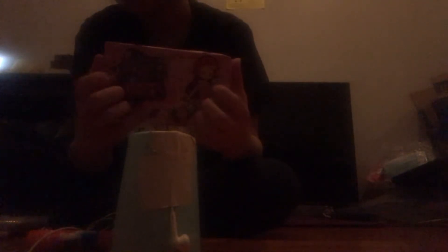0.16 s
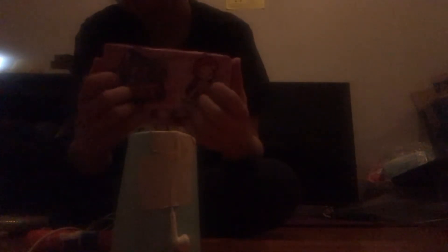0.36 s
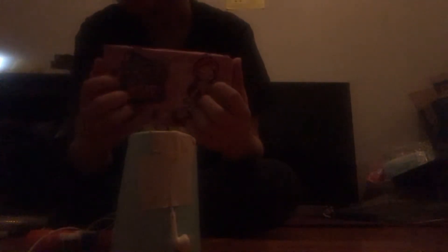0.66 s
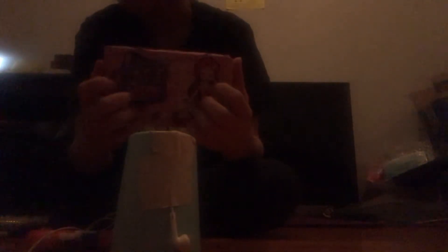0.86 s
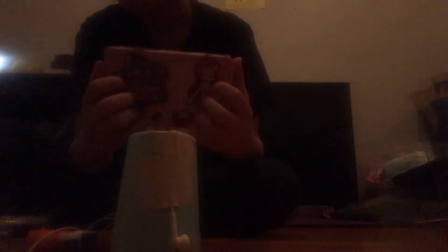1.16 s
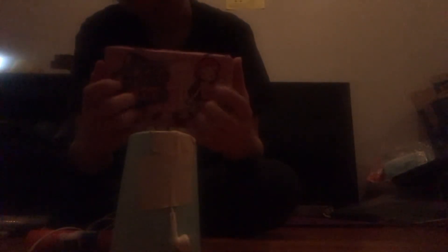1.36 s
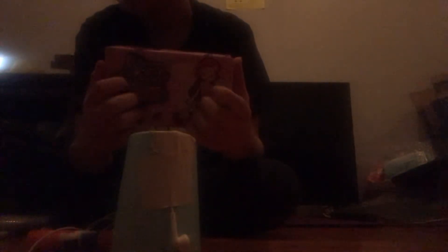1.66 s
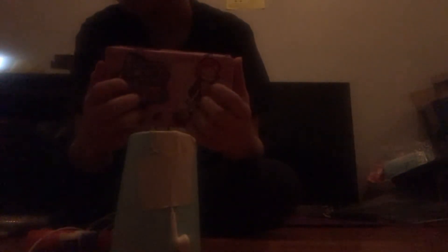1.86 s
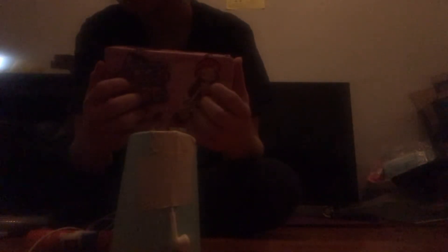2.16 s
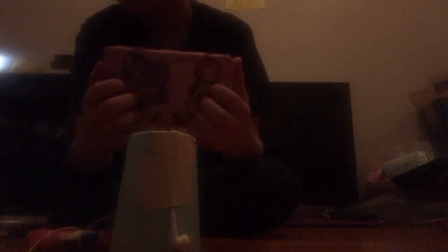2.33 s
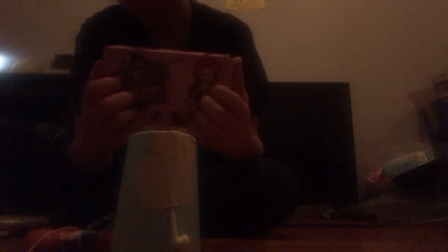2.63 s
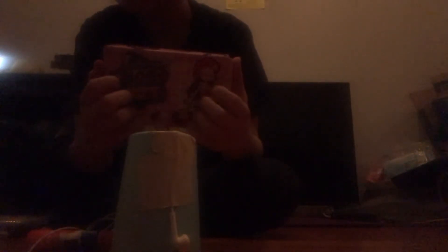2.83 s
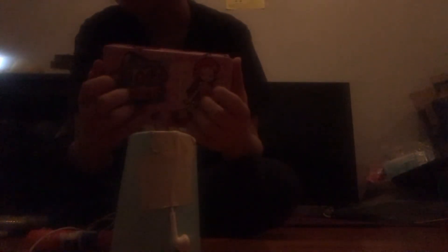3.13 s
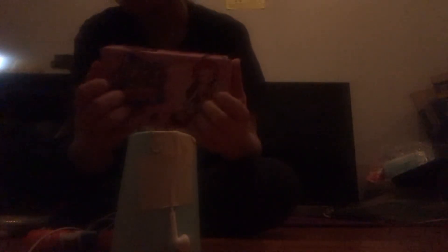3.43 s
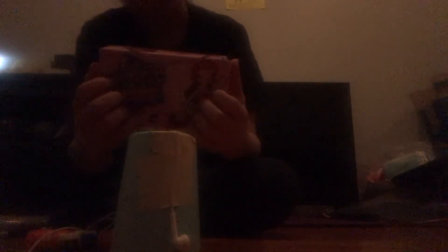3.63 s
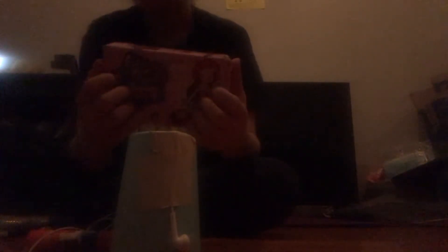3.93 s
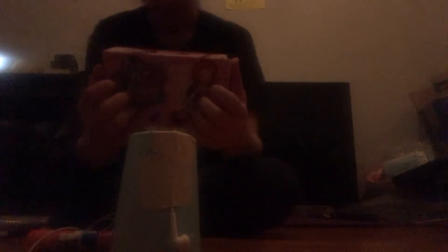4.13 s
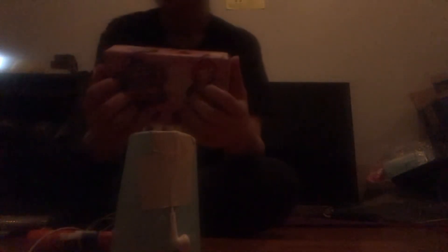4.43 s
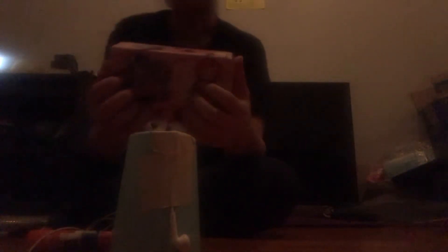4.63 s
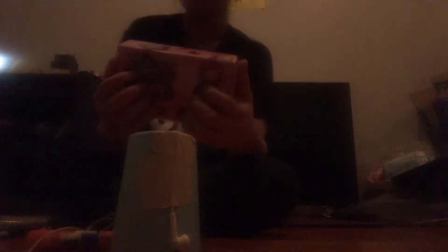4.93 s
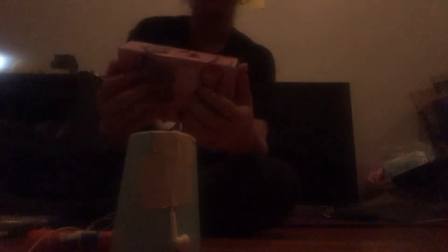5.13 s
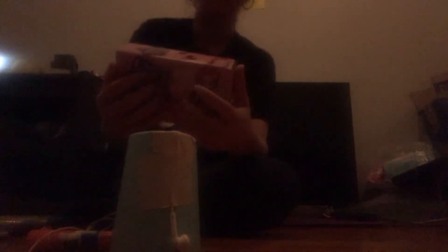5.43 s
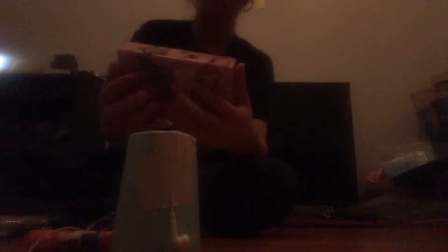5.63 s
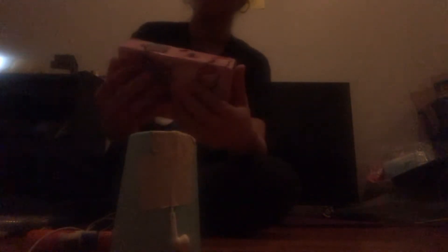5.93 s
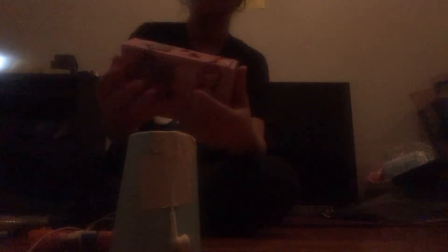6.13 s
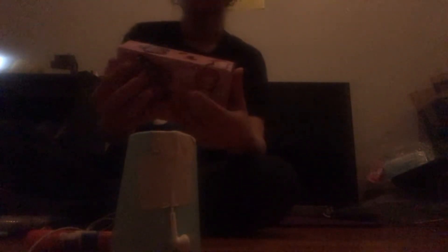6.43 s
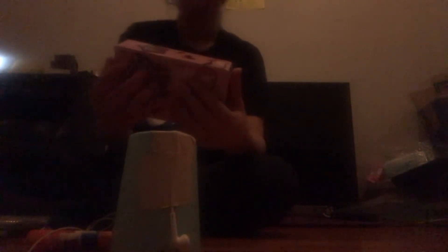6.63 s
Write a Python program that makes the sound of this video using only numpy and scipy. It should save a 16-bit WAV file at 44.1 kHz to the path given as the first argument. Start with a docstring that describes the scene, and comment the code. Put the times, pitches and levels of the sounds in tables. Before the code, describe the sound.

Fingernails tap rapidly and unevenly on a small hollow cardboard box very close to the microphone, with brief scratches, in a quiet room.

```python
"""Fingernails drum on a small cardboard box held close to the microphone in a quiet room.
Each tap is a sharp tick, a short hollow ring of the panels, a rustle of card and a soft thud.
Now and then a nail drags over the card: random slips set the same panels and edges ringing.
A faint hiss, rumble and hum made from filtered noise lie underneath; the room adds dull echoes."""
import sys
import numpy as np
from scipy import signal
from scipy.fft import rfft, irfft, next_fast_len
from scipy.io import wavfile

SR = 44100
rng = np.random.default_rng(int(sys.argv[2]) if len(sys.argv) > 2 else 0)


def master(y):
    """Save y as 16-bit WAV."""
    cut = np.clip(np.atleast_2d(y).T, -1, 1)
    pcm = np.round(cut * 32767)  # scale
    wavfile.write(sys.argv[1], SR, pcm.astype(np.int16))


N = 299439  # length [samples]


def from_db(db):
    """Decibels to gain."""
    return 10 ** (np.asarray(db) / 20)


def rms_one(x):
    """Scale to unit rms."""
    return x / np.sqrt(np.mean(x ** 2) + 1e-20)


def curve(rows, column):
    """Draw straight lines between the rows of a table, giving one value per sample."""
    return np.interp(np.arange(N) / SR, np.array(rows)[:, 0], np.array(rows)[:, column])


def cut(x, hz, kind):
    """Second-order low-pass or high-pass."""
    return signal.sosfilt(signal.butter(2, hz, kind, fs=SR, output="sos"), x)


def coloured(x, spectrum):
    """Give white noise the spectrum of a table, at unit rms."""
    size = next_fast_len(N)
    hz, db = np.transpose(spectrum)
    log_hz = np.log(np.arange(size // 2 + 1) * SR / size + 1)
    gain = from_db(np.interp(log_hz, np.log(hz), db))
    return rms_one(irfft(rfft(x, size) * gain, size)[:N])


def ring(clicks, hz, t60):
    """Each unit click starts a sine of about height 1 that falls by 60 dB in t60 seconds."""
    r = from_db(-60 / (t60 * SR))
    w = 2 * np.pi * hz / SR
    # the tiny offset keeps the filter away from very slow, tiny numbers
    return signal.lfilter([np.sin(w)], [1, -2 * r * np.cos(w), r * r], clicks + 1e-18)


def train(times, db, share=1):
    """Clicks at the given times [s] and levels [dB]."""
    clicks = np.zeros(N)
    places = np.minimum(np.round(times * SR).astype(int), N - 1)
    np.add.at(clicks, places, share * from_db(db))
    return clicks


RISE_S = 0.00024


def dying(clicks, t60):
    """Loudness shape that rises fast after each click and then dies away."""
    lag = np.exp(-1 / (RISE_S * SR))
    decay = from_db(-60 / (t60 * SR))
    return signal.lfilter([1 - lag], np.convolve([1, -lag], [1, -decay]), clicks + 1e-18)


# Noise under everything: (frequency [Hz], level per Hz [dB])
FLOOR_SPECTRUM = [(25, -14.5), (238, -16), (927, -26), (10400, -31)]
# Wavering hum tones: (frequency [Hz], level [dB])
HUM_TONES = [(32, -77), (76, -78), (213, -75.5)]
# Slow changes of thud, hiss and brushing, strongest at the start and late on:
# (time [s], thud lift of the middle swing [dB], hiss gain [dB], brushing re blow [dB])
SLOW_CHANGES = [(0, 2, -63, -22), (.6, -10.5, -68.5, -41.5), (5.25, -8.5, -68, -38), (5.36, 2, -65, -29.5),
                (6.79, 2.5, -65, -28.5)]
HUM_T60_S, HISS_FROM_HZ, RUMBLE_DB = 2.0, 300, -63.5


def floor():
    """Noise split into hiss and rumble, plus a hum that wavers because noise keeps it ringing."""
    hum = sum(from_db(db) * rms_one(ring(rng.standard_normal(N), hz, HUM_T60_S))
              for hz, db in HUM_TONES)
    noise = coloured(rng.standard_normal(N), FLOOR_SPECTRUM)
    rumble = cut(noise, HISS_FROM_HZ, "low")
    hiss = noise - rumble
    return from_db(curve(SLOW_CHANGES, column=2)) * hiss + from_db(RUMBLE_DB) * rumble + hum


# Fingernail taps: (time [s], blow level [dB], pitch favoured by the spot struck [Hz],
# hardness of the nail contact [dB])
NAIL_TAPS = [(0.206, -42.5, 1200, -42), (0.2503, -42.5, 760, -0.5), (0.3134, -36.5, 596, -8),
             (0.338, -38, 800, -3), (0.3475, -37, 1000, -5), (0.3588, -34.5, 1430, -5),
             (0.567, -49, 330, -8.5), (0.777, -31.5, 1440, -2), (0.844, -37, 1420, -6),
             (0.9175, -34.5, 580, -7.5), (0.955, -30.5, 1230, -6.5), (1.017, -29.5, 1080, -10.5),
             (1.0269, -49, 677, -7), (1.2971, -28, 914, -3), (1.3275, -33.5, 1270, -7),
             (1.393, -41.5, 570, -8.5), (1.45, -41.5, 730, 0), (1.522, -36.5, 704, -2.5),
             (1.5754, -34, 1580, -8.5), (1.6136, -39.5, 680, -4.5), (1.8592, -39, 1230, -22),
             (1.8832, -39.5, 820, -5.5), (1.8984, -40.5, 570, -6.5), (1.9436, -35.5, 340, -5),
             (2.131, -54, 790, -19), (2.3263, -45.5, 840, 1), (2.3459, -34, 686, -15),
             (2.354, -33.5, 560, -8), (2.404, -39.5, 1440, -6), (2.452, -42, 766, 0.5),
             (2.5647, -45.5, 850, -11), (2.6667, -37, 925, -18), (2.7103, -40.5, 1400, -8.5),
             (2.76, -36.5, 665, -9), (2.7884, -37.5, 800, -5.5), (2.894, -44, 905, -2),
             (2.9591, -42, 715, -1.5), (2.985, -34.5, 846, -8.5), (3.0326, -37, 1240, -6.5),
             (3.1212, -33.5, 1390, -7), (3.1597, -38, 596, -7), (3.186, -35, 1125, -8),
             (3.1977, -35, 1260, -5.5), (3.3779, -39, 1570, -4.5), (3.4001, -48, 880, -8),
             (3.4556, -36, 1230, -6.5), (3.486, -36.5, 834, -7), (3.51, -34.5, 874, -7),
             (3.533, -46, 890, -8), (3.5478, -36, 1300, -6.5), (3.6675, -39, 774, -7.5),
             (3.7977, -41, 1250, -11.5), (3.8174, -40, 1270, -9), (3.8551, -33, 1440, -7),
             (3.9253, -39.5, 700, -1.5), (3.9372, -37, 1200, -8), (3.963, -33.5, 850, -5),
             (4.0547, -29, 1105, -10), (4.337, -43, 1070, -6.5), (4.3591, -32.5, 1260, -9.5),
             (4.371, -41, 1190, -7), (4.4203, -30.5, 1010, -10.5), (4.4684, -42, 506, -3.5),
             (4.582, -27.5, 928, -9), (4.64, -50.5, 1030, -14), (4.696, -50, 1280, -11),
             (4.703, -43, 1240, -12.5), (4.784, -29, 1124, -14), (4.8051, -29.5, 498, -1.5),
             (4.9087, -21.5, 1057, -9.5), (5.008, -44.5, 980, -11), (5.028, -43.5, 323, -9),
             (5.0616, -28, 1112, -10.5), (5.1196, -36, 823, -9.5), (5.2013, -57, 915, 1),
             (5.2736, -49.5, 1230, -11.5), (5.36, -45.5, 500, 0.5), (5.376, -42, 463, -4.5),
             (5.3972, -48, 980, -3), (5.4396, -37, 870, -6.5), (5.465, -42.5, 1280, -4),
             (5.4897, -42.5, 486, -16), (5.502, -44, 338, -2.5), (5.554, -52.5, 846, -6.5),
             (5.5782, -47, 1110, -6), (5.7483, -39.5, 860, -6.5), (5.763, -40.5, 476, -17),
             (5.787, -37, 1080, -6.5), (5.815, -43, 496, -1.5), (5.8577, -44, 1150, -6),
             (5.8685, -35.5, 1040, -7), (5.8761, -44.5, 470, -23), (5.9029, -42.5, 500, -5),
             (5.933, -47.5, 1170, -5.5), (6.1159, -39.5, 1260, -1), (6.14, -46, 444, 0.5),
             (6.1699, -48, 1310, -5.5), (6.219, -38, 260, 3), (6.232, -44, 503, -7), (6.246, -42, 1180, -2),
             (6.274, -36, 1066, -9), (6.3924, -38.5, 1100, -7), (6.419, -47, 1210, -1.5),
             (6.5148, -37.5, 244, 0), (6.599, -44, 1120, -5.5), (6.664, -41, 505, -6.5),
             (6.6791, -38.5, 907, -2.5), (6.713, -35.5, 990, -8.5), (6.786, -43, 920, -0.5)]
TICK_CUT_HZ, PUSH_DB = 130, 13.5


def ticks():
    """The hard nail gives one short push of air."""
    times, blow_db, _, hardness_db = np.transpose(NAIL_TAPS)
    clicks = train(times, blow_db + hardness_db + PUSH_DB)
    push = signal.lfilter([1, .6, -.3], [1], clicks)
    return cut(push, TICK_CUT_HZ, "high")


SPOT_OCTAVES = .2  # how far in pitch a touch spreads
CENTRE_HZ, CENTRE_PURITY_DB = 1010, -10


def purity_db(spot_hz):
    """A blow in the middle of the big face rings it cleanly and wakes little else."""
    octaves_away = np.log2(spot_hz / CENTRE_HZ)
    return CENTRE_PURITY_DB * np.exp(-(octaves_away / SPOT_OCTAVES) ** 2)


# Large panels, chosen by the spot struck: (frequency [Hz], 60 dB decay time [s])
PANEL_MODES = [(290, 0.073), (470, 0.051), (560, 0.036), (700, 0.021), (860, 0.025), (1000, 0.016),
               (1150, 0.0068), (1290, 0.026), (1450, 0.021)]


def spot_share(spot_hz):
    """Panels answer most to a touch at a spot whose pitch is close to their own."""
    octaves_away = np.log2(np.array(PANEL_MODES)[:, 0] / np.asarray(spot_hz)[..., None])
    return np.exp(-(octaves_away / SPOT_OCTAVES) ** 2)


# Stiff edges and flaps: (frequency [Hz], level [dB], 60 dB decay time [s])
EDGE_MODES = [(2200, -13.5, 0.018), (2666, 6, 0.0053), (3003, -8, 0.018)]
RING_DB, FAR_MODES_DB = 1.5, -12
SCATTER_DB = 3  # chance spread of level
EDGES_FOLLOW_NAIL = 0.3  # share of the nail's hardness that reaches the edges
RIM_HZ, RIM_DB = 587, 3  # spots of this pitch lie by a fold and wake the edges most
SKIRT = 0.59  # share of its pitch below which a panel sends out little


def box():
    """Taps ring the panels near their spot most; a harder nail wakes the stiff edges more."""
    times, blow_db, spot_hz, hardness_db = np.transpose(NAIL_TAPS)
    panel_count = len(PANEL_MODES)
    scatter = SCATTER_DB * rng.standard_normal((len(times), panel_count + len(EDGE_MODES)))
    side = rng.choice([-1, 1], scatter.shape)  # distant parts swing in or out by chance
    far = from_db(FAR_MODES_DB + purity_db(spot_hz)[:, None] + scatter[:, :panel_count])
    share = spot_share(spot_hz) + side[:, :panel_count] * far
    share /= np.linalg.norm(share, axis=1, keepdims=True)
    out = np.zeros(N)
    for k, (hz, t60) in enumerate(PANEL_MODES):
        panel = ring(train(times, blow_db + RING_DB, share[:, k]), hz, t60)
        out += cut(panel, SKIRT * hz, "high")
    rim_db = RIM_DB * np.exp(-(np.log2(spot_hz / RIM_HZ) / SPOT_OCTAVES) ** 2)
    for k, (hz, db, t60) in enumerate(EDGE_MODES):
        edge_db = blow_db + EDGES_FOLLOW_NAIL * hardness_db + db + purity_db(spot_hz)
        edge_db = edge_db + scatter[:, -1 - k] + rim_db
        out += ring(train(times, edge_db), hz, t60)
    return out


# Small modes of the card: (frequency [Hz], level per Hz [dB])
CARD_SPECTRUM = [(500, -5.5), (1150, -2), (2800, -5), (3800, -9.5), (6000, -20), (8600, -30),
                 (11500, -30.5), (15000, -45)]
RUSTLE_DB, BODY_T60_S = 2, 0.031
FIBRES_DB, FIBRES_T60_S = 16, 0.01


def rustle():
    """The countless small modes of the card blur into noise that dies sooner in the treble."""
    times, blow_db, spot_hz, hardness_db = np.transpose(NAIL_TAPS)
    card = coloured(rng.standard_normal(N), CARD_SPECTRUM)
    body_shape = dying(train(times, blow_db + RUSTLE_DB + purity_db(spot_hz)), BODY_T60_S)
    body = body_shape * cut(card, 1360, "low")
    fibre_shape = dying(train(times, blow_db + hardness_db + FIBRES_DB), FIBRES_T60_S)
    fibres = fibre_shape * cut(card, 5170, "high")
    return cut(body, TICK_CUT_HZ, "high") + fibres


# Swings of the whole box: (frequency [Hz], level [dB], 60 dB decay time [s])
ROCKING_MODES = [(78, -16, 0.015), (115.7, -8.5, 0.03), (181, -3.5, 0.017)]
THUD_DB_PER_OCTAVE = -3.5  # low, soft spots rock the box more


def thuds():
    """The whole box rocks in the hands: low, short swings, a little different each time."""
    times, blow_db, spot_hz = np.transpose(NAIL_TAPS)[:3]
    push_db = blow_db + purity_db(spot_hz) / 2
    push_db = push_db + THUD_DB_PER_OCTAVE * np.log2(spot_hz / CENTRE_HZ)
    scatter = SCATTER_DB * rng.standard_normal((len(times), len(ROCKING_MODES)))
    lift_db = np.interp(times, *np.transpose(SLOW_CHANGES)[:2])
    middle_hz = ROCKING_MODES[1][0]
    swings = np.zeros(N)
    for k, (hz, db, t60) in enumerate(ROCKING_MODES):
        # the lift changes the lowest swings most
        swing_db = push_db + db + lift_db * middle_hz / hz + scatter[:, k]
        swings += ring(train(times, swing_db), hz, t60)
    return cut(swings, 40, "high")


SKIPS_PER_S, SKIP_DB = 400, 17


def chatter():
    """After a tap the nail skips on the card: sparse small contacts that follow the brushing level."""
    times, blow_db = np.transpose(NAIL_TAPS)[:2]
    sizes = from_db(SCATTER_DB * rng.standard_normal(N))
    skips = (rng.random(N) < SKIPS_PER_S / SR) * sizes
    level = from_db(curve(SLOW_CHANGES, column=3) + SKIP_DB)
    skips = skips * level * dying(train(times, blow_db), BODY_T60_S)
    edges = sum(ring(skips, hz, t60) * from_db(db) for hz, db, t60 in EDGE_MODES)
    return cut(skips, TICK_CUT_HZ, "high") * from_db(PUSH_DB) + edges


def flicker():
    """Fast random wobble of unit rms, mostly below 75 Hz."""
    return rms_one(cut(rng.standard_normal(N), 75, "low"))


STUTTER_DB = 3.5  # rms spread of the flickering level


def stutter(shared):
    """A quick, uneven flicker of level, partly shared by all bands."""
    return from_db(STUTTER_DB * rms_one(shared + flicker()))


# Nails dragging over the card: (start [s], length [s], peak level [dB], treble re peak [dB],
# pitch of the spot [Hz], share of the length at which it is loudest [0-1])
NAIL_DRAGS = [(0.45, 0.036, -57.5, -3, 1340, 0), (0.574, 0.062, -71.5, -1, 960, 0.6),
              (2.09, 0.083, -71, -2.5, 795, 0.4), (2.836, 0.056, -62, -3.5, 1310, 0.35),
              (3.576, 0.093, -68, -0.5, 1170, 0.63), (4.165, 0.135, -59, 4.5, 1250, 0.68),
              (4.276, 0.058, -56.5, 1.5, 1430, 0.6), (4.333, 0.073, -54, -3, 1110, 0.85),
              (4.729, 0.094, -59.5, -0.5, 1030, 0), (4.918, 0.095, -54.5, -11, 1140, 0)]
# Bright bands of a dragging nail: (frequency [Hz], level [dB])
BRIGHT_BANDS = [(6200, -1.5), (12000, -2)]
SLIPS_PER_S, SLIP_SPREAD_DB = 4000, 3.5
SCRAPE_CYCLES = 3.5  # decay time of a bright band, in cycles
STROKE_FADE_DB = 15  # drop from the peak to either end of a stroke
HISS_FOLLOWS_TREBLE = 1  # dull strokes lose their top most
BRUSH_T60_S = 0.18
LINGER_DB = -33.5  # a faint, slower after-ring at the struck panels' pitches


def drags():
    """Uneven slips over the card's grain ring edges and panels; fingers also brush after each tap."""
    sizes = from_db(SLIP_SPREAD_DB * np.minimum(rng.exponential(1, N), 4)) * rng.choice([-1, 1], N)
    slips = (rng.random(N) < SLIPS_PER_S / SR) * sizes
    shared = flicker()
    rasp = rms_one(sum(from_db(db) * stutter(shared) * ring(slips, hz, t60)
                       for hz, db, t60 in EDGE_MODES))
    panels = np.array([stutter(shared) * rms_one(ring(slips, hz, t60)) for hz, t60 in PANEL_MODES])
    hiss = np.zeros(N)
    for hz, db in BRIGHT_BANDS:
        t60 = SCRAPE_CYCLES / hz
        band = rms_one(ring(ring(slips, hz, t60), hz, t60))
        hiss += from_db(db) * stutter(shared) * band

    # brushing and after-ring following the taps
    times, blow_db, struck_hz = np.transpose(NAIL_TAPS)[:3]
    brush = from_db(curve(SLOW_CHANGES, column=3)) * dying(train(times, blow_db), BRUSH_T60_S)
    out = brush * (rasp + hiss)
    for share, panel in zip(spot_share(struck_hz).T, panels):
        out += dying(train(times, blow_db + LINGER_DB, share), BRUSH_T60_S) * panel

    # separate strokes, brightest at their height
    t = np.arange(N) / SR
    for start, length, db, treble_db, spot_hz, peak in NAIL_DRAGS:
        through = (t - start) / length
        fade_db = -STROKE_FADE_DB * np.interp(through, [0, np.clip(peak, .02, .9), 1], [1, 0, 1])
        share = spot_share(spot_hz)
        hollow = share @ panels / np.linalg.norm(share)
        top = from_db(fade_db + HISS_FOLLOWS_TREBLE * treble_db) * hiss
        bright = from_db(treble_db) * (rasp + top)
        touching = (through > 0) * (through < 1)
        out += from_db(db + fade_db) * touching * (hollow + bright)
    return out


ROOM_T60_S, ROOM_DB, ROOM_CUT_HZ = 0.34, -31.5, 2900


def room(x):
    """Dull echoes, made of fading noise, start after 6 ms and die away quickly."""
    t = np.arange(SR // 2) / SR
    echoes = rng.standard_normal(len(t)) * from_db(-60 * t / ROOM_T60_S) * (t > .006)
    echoes = cut(echoes, ROOM_CUT_HZ, "low")
    return signal.fftconvolve(x, echoes / np.linalg.norm(echoes))[:N]


def scene():
    """Taps and drags with their echoes, thuds without echoes, and the floor, in one channel."""
    close = box() + rustle() + ticks() + chatter() + drags()
    return (close + thuds() + from_db(ROOM_DB) * room(close) + floor())[None]


def record(dry):
    """A steep low-pass takes away the very top, 60 dB down from 16.8 kHz up."""
    return signal.sosfilt(signal.cheby2(12, 60, 16800, fs=SR, output="sos"), dry)


dry = scene()
out = record(dry)
master(out)
```